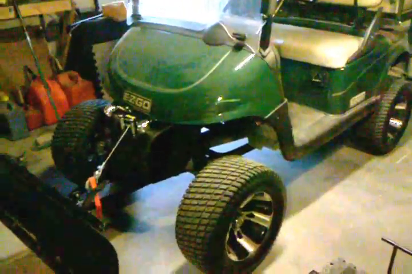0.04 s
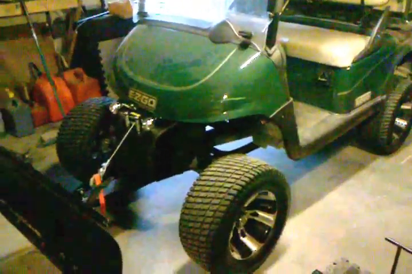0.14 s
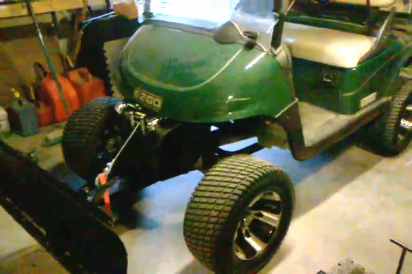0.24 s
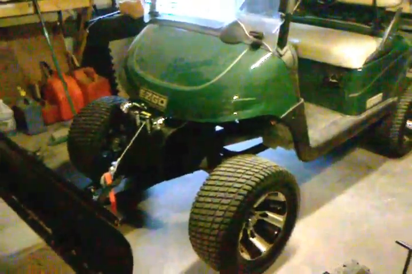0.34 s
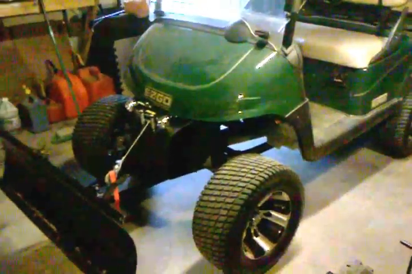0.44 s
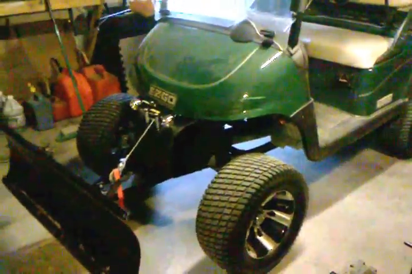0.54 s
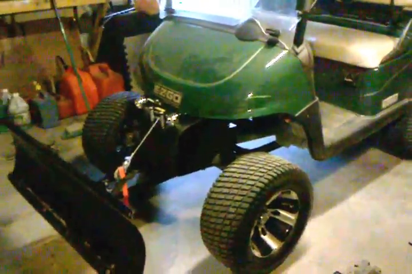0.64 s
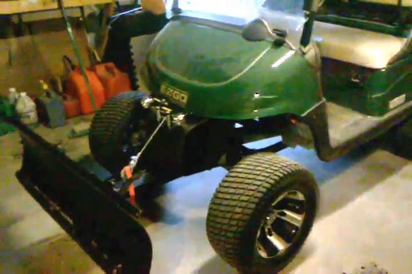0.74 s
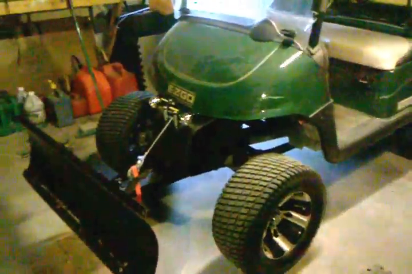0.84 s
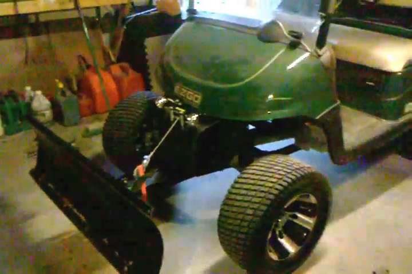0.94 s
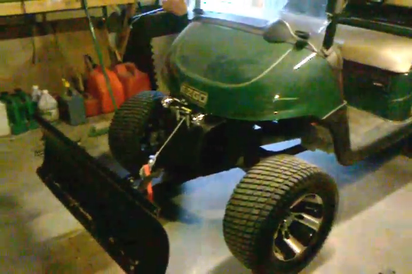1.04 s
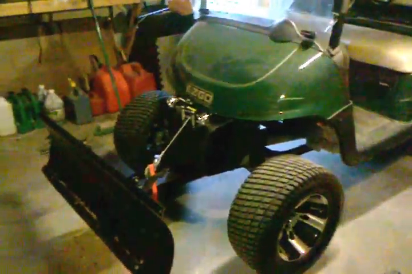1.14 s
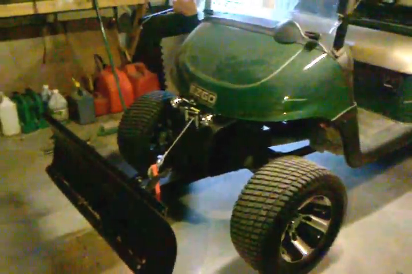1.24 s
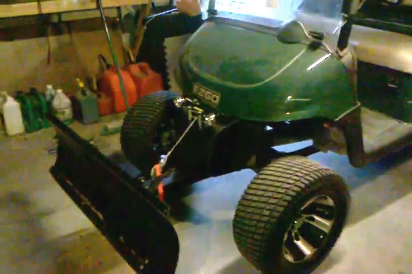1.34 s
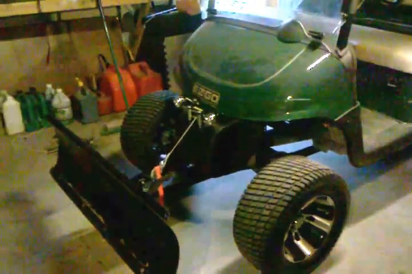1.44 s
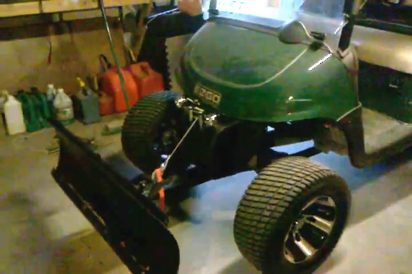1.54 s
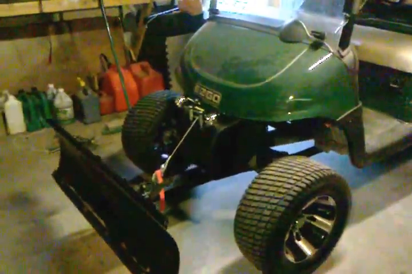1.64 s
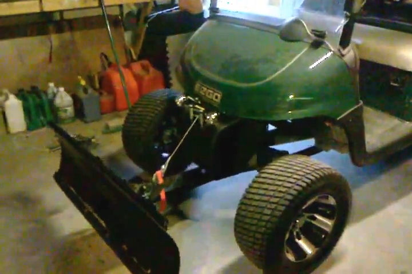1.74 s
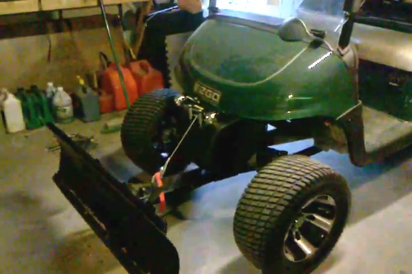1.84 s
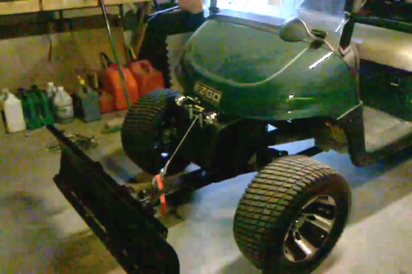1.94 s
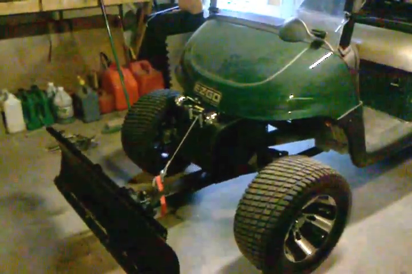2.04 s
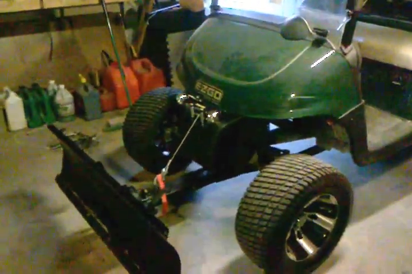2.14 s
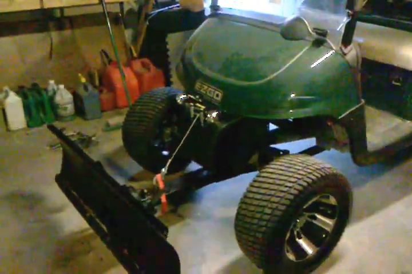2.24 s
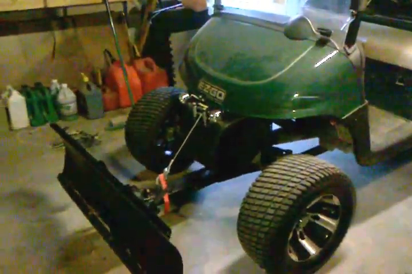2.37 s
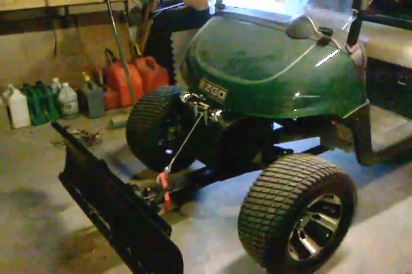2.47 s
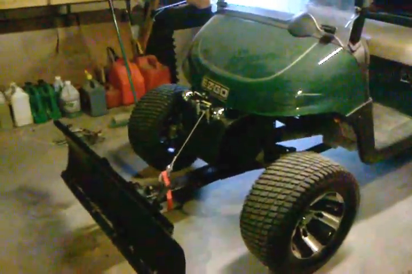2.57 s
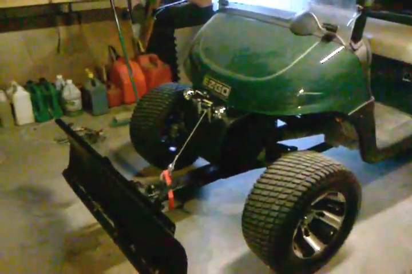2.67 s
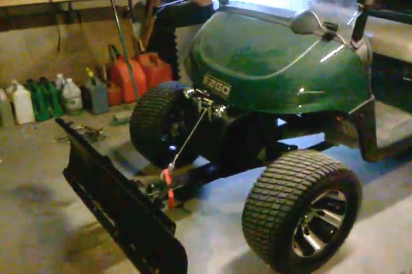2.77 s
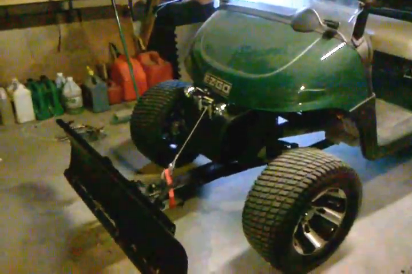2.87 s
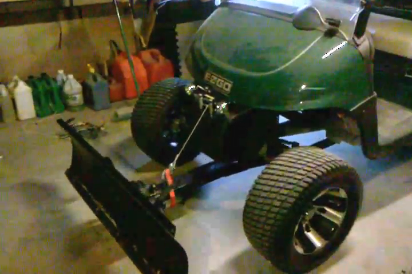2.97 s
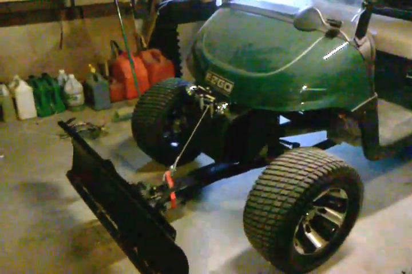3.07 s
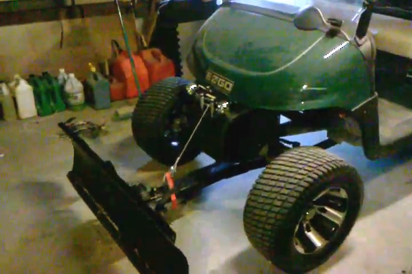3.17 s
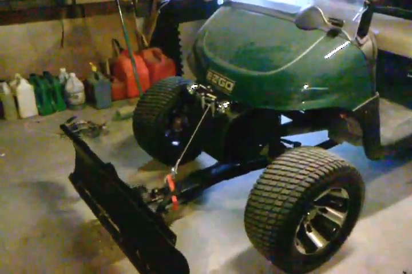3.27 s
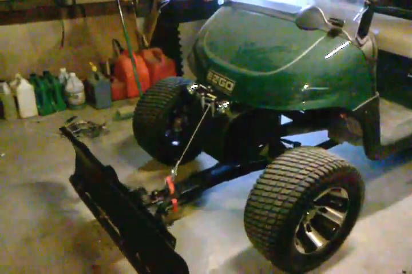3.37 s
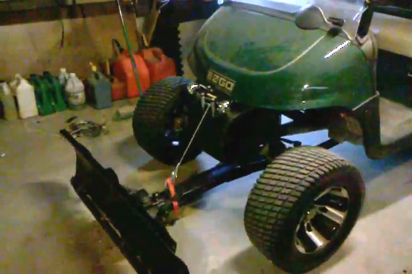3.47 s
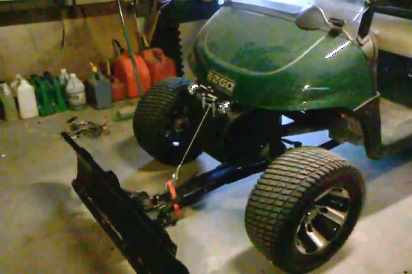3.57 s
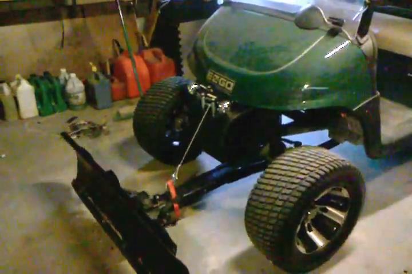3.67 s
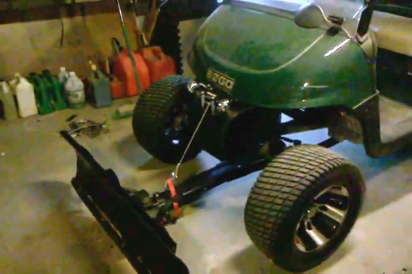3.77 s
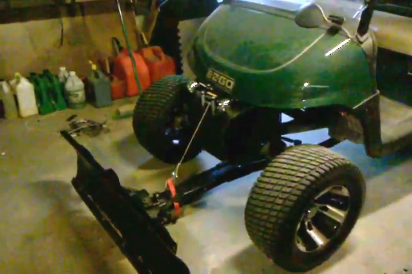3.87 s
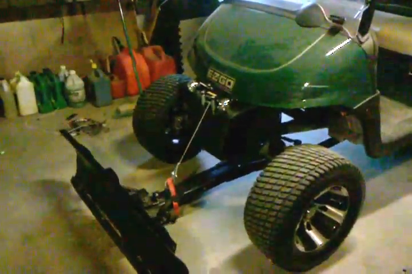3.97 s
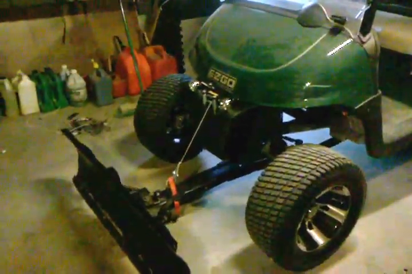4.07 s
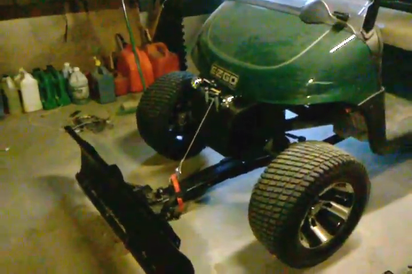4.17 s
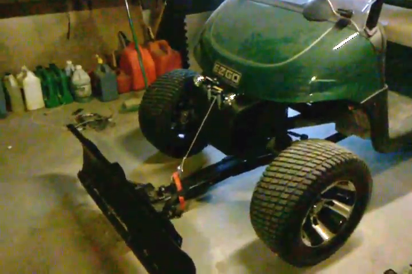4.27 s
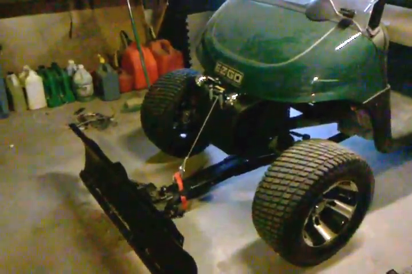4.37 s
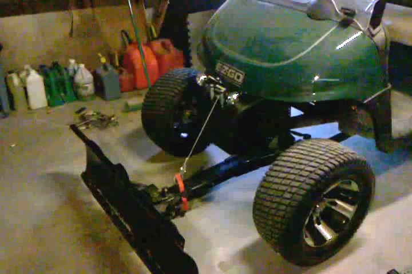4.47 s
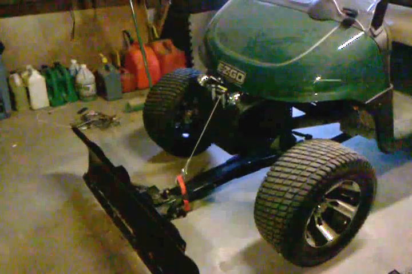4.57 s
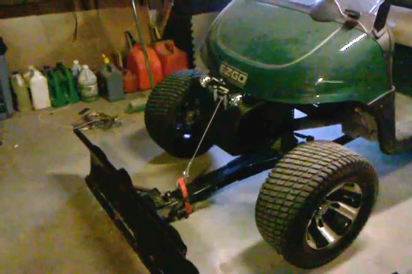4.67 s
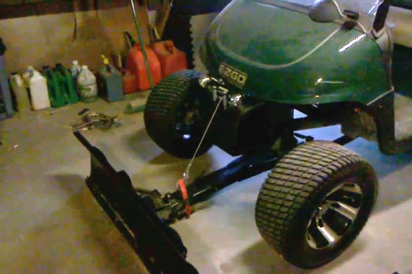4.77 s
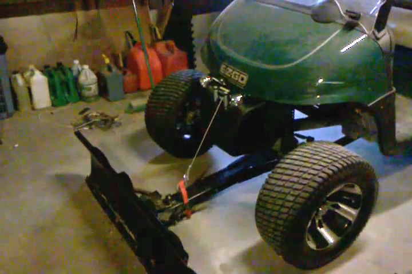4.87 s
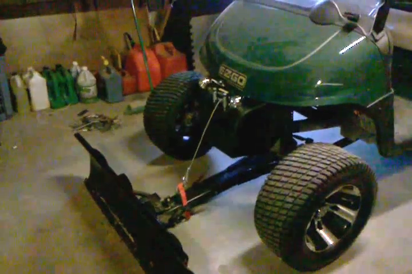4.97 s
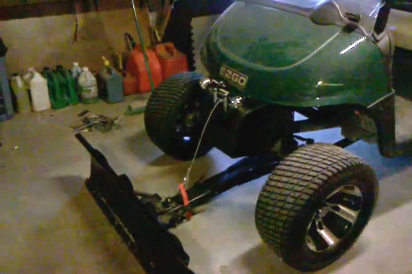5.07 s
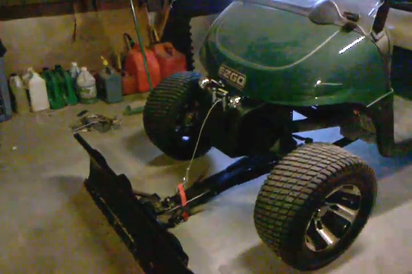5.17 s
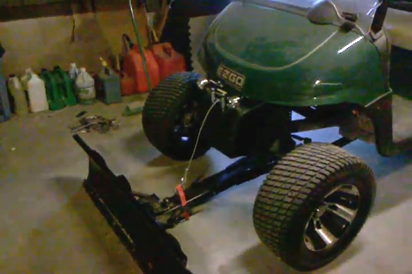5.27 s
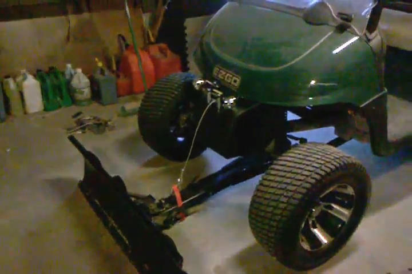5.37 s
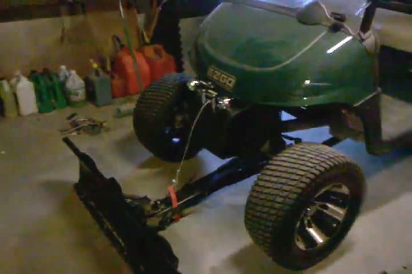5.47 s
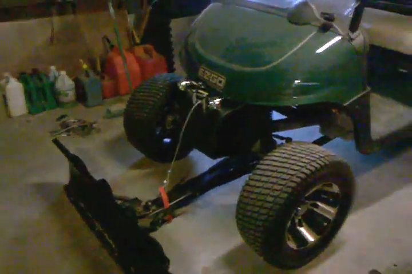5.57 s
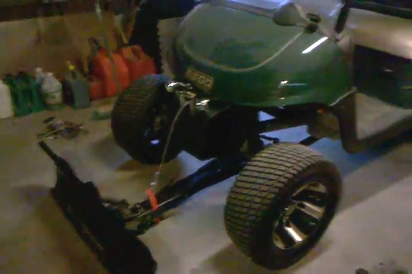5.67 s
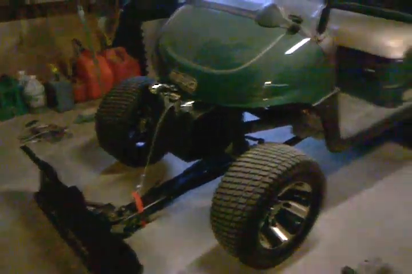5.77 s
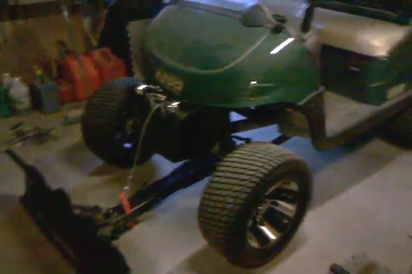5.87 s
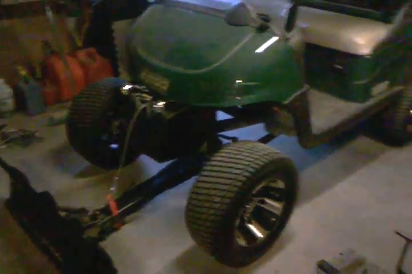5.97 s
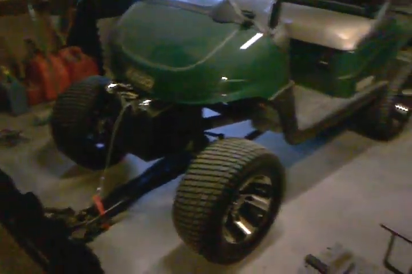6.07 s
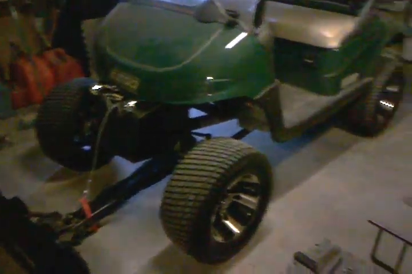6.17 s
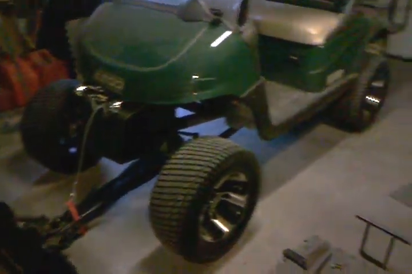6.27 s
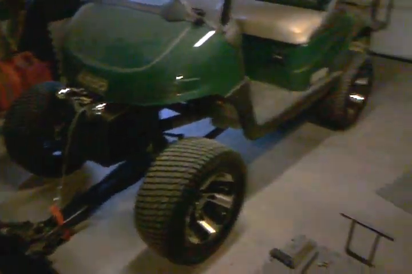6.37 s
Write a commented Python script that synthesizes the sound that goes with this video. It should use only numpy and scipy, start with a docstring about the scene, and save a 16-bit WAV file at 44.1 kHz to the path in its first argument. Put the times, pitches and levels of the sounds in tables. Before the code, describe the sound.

Faint rumble and hiss fill a garage with a short echo. At about 1.2 seconds a plastic switch clicks close to the microphone, and from 1.4 to 2.1 seconds a small electric winch runs a few metres away, with a steady gear whine, a rattling housing and a light hiss. A second click at 2.6 seconds leads to another run from 2.8 to 3.7 seconds, which rasps harder in a few brief surges. A third click comes at 4.3 seconds, and the winch runs again from 4.5 seconds. At about 5 seconds a steel plough blade lands on the concrete with a quick cluster of crunching, ringing knocks, and the unloaded winch turns much quieter. It stops at about 5.3 seconds as the metal hook clinks twice on the slack cable. The ringing fades, leaving faint room noise until about 6.4 seconds.

```python
"""A winch lowers a plough blade

In a garage, over faint room noise, a switch clicks before each of three short runs of a small electric
winch. Its gear teeth whine as they meet and rattle in their housing. In the last run the steel blade
lands on the concrete and rings, then the hook on the slack cable clinks. A microphone with two sound
openings (ports) hears it all from a few metres away."""
import sys
import numpy as np
from scipy import signal
from scipy.fft import rfft, irfft, next_fast_len
from scipy.io import wavfile
from scipy.ndimage import uniform_filter1d

SR = 44100
rng = np.random.default_rng(int(sys.argv[2]) if len(sys.argv) > 2 else 0)


def generate_wav(signal):
    """Clip the signal to [-1, 1] and save it as 16-bit WAV at the path in sys.argv[1]."""
    frames = np.transpose(np.atleast_2d(signal))
    scaled = np.clip(frames, -1, 1) * 32767
    pcm = np.round(scaled).astype(np.int16)
    wavfile.write(sys.argv[1], SR, pcm)


N = 282681
TIME = np.arange(N) / SR
FFT_SIZE = next_fast_len(N + 3 * SR // 2, real=True)  # spare length for echoes
FREQ = np.arange(FFT_SIZE // 2 + 1) * SR / FFT_SIZE
PORT_LAG_S = 15 / SR  # time sound takes from one port to the other


def gain(db):
    """Turn decibels into a number to multiply by."""
    return 10 ** (np.asarray(db) / 20)


def unit(x):
    """Scale a signal to an average power of 1."""
    return x / np.sqrt(np.mean(x ** 2))


def curve(points):
    """Join (Hz, value) points into a curve over all frequencies, on a log scale."""
    hz, value = np.transpose(points)
    return np.interp(np.log(FREQ + 1), np.log(hz), value)


def filtered(x, response):
    """Filter a signal with one gain for each frequency."""
    return irfft(rfft(x, FFT_SIZE) * response, FFT_SIZE)[..., :N]


def resonances(rows):
    """A filter with a peak for each (Hz, width Hz, dB) row, alternating in sign."""
    return sum((-1) ** k * gain(db) * 1j * FREQ * width / (hz ** 2 - FREQ ** 2 + 1j * FREQ * width)
               for k, (hz, width, db) in enumerate(rows))


def lows(split_hz):
    """A steep curve: 1 below the split, 0 above it."""
    return 1 / (1 + (FREQ / split_hz) ** 10)


def fade(age, fade_s):
    """Die away by 60 dB in fade_s seconds, as all fade times here do."""
    return np.exp(-np.log(1000) * age / fade_s)


def drift(rate_hz):
    """Smooth random wandering, about 1 in size."""
    step = max(int(SR / rate_hz), 1)
    stairs = np.repeat(rng.standard_normal(N)[:N // step + 1], step)
    return unit(uniform_filter1d(stairs, step)[:N])


def blows(hits, contact_s):
    """A short, rough push for each (s, dB) hit."""
    push = np.zeros(N)
    for start, db in hits:
        age = TIME[:N - int(start * SR)]
        scrape = rng.standard_normal(N)[:len(age)] * np.exp(-age / contact_s)
        push[-len(age):] += gain(db) * scrape
    return push


def ring(hits, tones):
    """Each (s, dB) hit sets an object's own (Hz, dB, fade s) tones ringing."""
    out = np.zeros(N)
    for start, db in hits:
        age = TIME[:N - int(start * SR)]
        attack = 1 - np.exp(-age / 0.002)
        for hz, tone_db, fade_s in tones:
            wave = np.sin(2 * np.pi * (hz * age + rng.random()))
            out[-len(age):] += gain(db + tone_db) * wave * fade(age, fade_s) * attack
    return out


def surrounding_noise(port_match=0.93):
    """Noise from all sides, as the ports' sum and difference; they hear nearly the same bass."""
    likeness = port_match * np.sinc(2 * FREQ * PORT_LAG_S)
    return filtered(rng.standard_normal((2, N)), np.sqrt([1 + likeness, 1 - likeness]) / np.sqrt(2))


def room_noise():
    """A soft rumble and hiss from all around, slowly rising and falling."""
    # tone colour of the noise: (frequency [Hz], relative level [dB])
    spectrum = [(25, -25.5), (70, -10), (160, -10), (310, 0), (600, -4), (1000, -10.5), (1900, -11),
                (2800, -19), (4500, -20.5), (7500, -14.5), (10000, -19), (13000, -18.5)]
    # its loudness: (time [s], rumble [dB], hiss [dB])
    levels = [(.65, -65, -65), (1.1, -69, -69), (2.7, -60.5, -62.5), (4.1, -64.5, -70), (4.45, -63, -66),
              (5.5, -62, -65.5), (5.92, -60.5, -62), (6.0, -65.5, -71), (6.4, -65.5, -64)]
    times, *columns = np.transpose(levels)
    rumble_db, hiss_db = [np.interp(TIME, times, column) for column in columns]
    colour, below = gain(curve(spectrum)), lows(3000)
    rumble = unit(filtered(surrounding_noise(), colour * np.sqrt(below)))
    rumble *= gain(rumble_db + 0.64 * drift(8.3))
    hiss = unit(filtered(surrounding_noise(), colour * np.sqrt(1 - below)))
    return rumble + hiss * gain(hiss_db)


def switch(room):
    """A plastic button snaps close to the microphone."""
    # presses: (time [s], level [dB])
    clicks = [(1.1972, -31), (2.6282, -28.5), (4.2618, -28.5)]
    # resonances of the switch body: (frequency [Hz], width [Hz], level [dB])
    body = [(444, 400, -11.5), (1475, 370, -1.5), (5020, 290, 3), (7730, 1000, -1), (9700, 1400, -8),
            (12800, 2600, -11.5)]
    snap = filtered(blows(clicks, contact_s=0.0018), resonances(body))
    return in_garage(snap, room, direct_db=9.5, early_db=4.5, late_db=-7)


def late_echoes():
    """Echoes off concrete and shelves build up quickly; the low notes last longest."""
    # how long the garage echoes: (frequency [Hz], fade time [s])
    bands = [(150, 0.81), (320, 0.83), (700, 0.65), (1500, 0.61), (3000, 0.58), (7000, 0.5), (13000, 0.31)]
    noise = surrounding_noise()
    tail = 0
    for centre_hz, fade_s in bands:
        band = curve([(hz, hz == centre_hz) for hz, _ in bands])
        tail += filtered(noise, band) * fade(TIME, fade_s)
    return tail * (1 - np.exp(-TIME / 0.02))


def garage():
    """(Early, late) echo filters for two nearby spots; early echoes come off the floor and the cart."""
    spots = [(surrounding_noise() * fade(TIME, 0.067), late_echoes()) for _ in range(2)]
    return [[rfft(echo / np.linalg.norm(echo), FFT_SIZE) for echo in spot] for spot in spots]


def in_garage(x, room, direct_db, early_db, late_db, sway_hz=0.5967):
    """Sound from straight ahead, plus echoes that change as the hand-held microphone sways."""
    sway = 2 * np.pi * sway_hz * TIME
    echoes = sum(filtered(x * share, gain(early_db) * early + gain(late_db) * late)
                 for share, (early, late) in zip([np.cos(sway), np.sin(sway)], room))
    return echoes + gain(direct_db) * np.array([x, 0 * x])


def motor(grip_s=0.017, release_s=0.03, spin_up_s=0.035, coast_s=0.2):
    """The motor's turning force comes and goes quickly, while the gears coast on."""
    # runs: (on [s], off [s], level [dB], drum's time to gain speed [s], level drop [dB/s])
    runs = [(1.402, 2.121, -19.5, 0.052, 6), (2.830, 3.686, -21, 0.11, 2), (4.463, 5.256, -20.5, .035, 2)]
    force, speed, level_db, drum_lag = np.zeros((4, N))
    for on, off, db, take_up_s, drop in runs:
        held, released = np.maximum(TIME - on, 0), np.maximum(TIME - off, 0)
        force += (1 - np.exp(-held / grip_s)) * np.exp(-released / release_s)
        speed += (1 - np.exp(-held / spin_up_s)) * np.exp(-released / coast_s)
        level_db = np.where(TIME >= on, db - drop * (held - released), level_db)
        drum_lag = np.where(TIME >= on, np.exp(-held / take_up_s), drum_lag)  # 0 at full speed
    return force, np.minimum(speed, 1), level_db, drum_lag


def winch_levels(level_db, drum_lag, grounded_s=4.99, unload_s=0.079):
    """Rattle and hiss grow with speed, surge at times, and drop once the floor carries the blade."""
    # the gears briefly rasp harder: (time [s], rattle rise [dB], hiss rise [dB])
    surges = [(2.878, 4.5, 2.5), (2.934, 1.5, 2), (3.072, 3, 7), (3.171, 4.5, 5.5), (3.463, 2, 5),
              (4.797, 1, 1.5)]
    slack = np.clip((TIME - grounded_s) / unload_s, 0, 1)
    rattle_db = level_db - 10.5 * drum_lag - 13.5 * slack
    hiss_db = level_db - 12 - 10 * drum_lag - 8 * slack
    for peak_s, rattle_rise_db, hiss_rise_db in surges:
        surge = np.exp(-((TIME - peak_s) / 0.018) ** 2)
        rattle_db += rattle_rise_db * surge
        hiss_db += hiss_rise_db * surge
    return rattle_db, hiss_db


def gear_whine(tooth_phase, flutter_db=2, phase_drift=0.46):
    """Teeth meeting in turn make a stack of tones; wear makes each tone waver."""
    # tones of the whine: (multiple of the tooth rate, relative level [dB])
    tones = [(.5, -29.5), (1, 0.5), (2, 0.5), (3, -18), (4, -4.5), (5, -5), (6, -8), (7, -8), (8, -11.5)]
    whine = 0
    for multiple, db in tones:
        strength = gain(db + flutter_db * drift(22))
        phase = multiple * tooth_phase + 2 * np.pi * rng.random() + phase_drift * drift(14)
        whine += strength * np.sin(phase)
    return unit(whine)


def rattle_and_hiss(tooth_phase, rattle_db, hiss_db, taps_per_s=5000, scatter_db=3, flutter_db=2.1):
    """Loose gear teeth tap and ring the housing; the motor's sliding contacts (brushes) hiss."""
    # tone colour of the rattle and hiss: (frequency [Hz], relative level [dB])
    spectrum = [(30, -53.5), (100, -40.5), (170, -18.5), (310, -7), (450, -7), (750, -1.5), (1400, -2),
                (2200, -4.5), (3100, -15), (4500, -28.5), (6200, -21), (7600, -22), (10000, -30),
                (13000, -38)]
    # resonances of the housing and its bracket: (frequency [Hz], width [Hz], relative level [dB])
    body = [(293.8, 22, -0.5), (350.2, 16.6, 8), (697, 79, -12.5), (778, 5.7, 3.5), (937, 25, -13.5),
            (1038, 8.4, -4.5), (1245, 50, 2), (1310, 16, 9), (1442, 86, -0.5), (1546, 43, 6),
            (1706, 20, -9.5), (1860, 17, -1.5), (2120, 13, -11), (2298, 15, 4.5), (3500, 68, -28)]
    taps = (rng.random(N) < taps_per_s / SR) * rng.standard_normal(N)
    taps *= gain(scatter_db * rng.standard_normal(N))
    taps *= 1 + 0.06 * np.cos(tooth_phase)  # a little stronger once per tooth
    taps *= gain(flutter_db * drift(40))
    colour, below = gain(curve(spectrum)), lows(2910)
    teeth = gain(-1.41) * unit(filtered(taps, colour * np.sqrt(below)))
    housing = gain(-4) * unit(filtered(taps, resonances(body)))
    brushes = unit(filtered(taps + rng.standard_normal(N) / 2, colour * np.sqrt(1 - below)))
    return gain(rattle_db) * (teeth + housing) + gain(hiss_db) * brushes


def winch(room, tooth_hz=313.8, pulse_hz=13.7, pulse_db=2, throb_hz=21, throb_db=1):
    """The motor turns the cable drum through gears that whine and rattle."""
    force, speed, level_db, drum_lag = motor()
    rattle_db, hiss_db = winch_levels(level_db, drum_lag)
    # the drum loads the gears unevenly, so the pitch wanders
    wander = 1 + 0.00342 * drift(11) + 0.01702 * drift(260)
    tooth_phase = 2 * np.pi * np.cumsum(tooth_hz * np.sqrt(speed) * wander) / SR
    # the teeth only sing at speed and with weight on the cable
    load = np.tanh(gain(rattle_db + 26)) ** 2
    whine = force * speed ** 4 * load * gear_whine(tooth_phase)
    whine *= gain(pulse_db * np.cos(tooth_phase * pulse_hz / tooth_hz))  # from an off-centre gear
    throb = throb_db * np.cos(tooth_phase * throb_hz / tooth_hz)  # from a slower pair of gears
    clatter = force * rattle_and_hiss(tooth_phase, rattle_db + throb, hiss_db)
    return (in_garage(clatter, room, direct_db=-6, early_db=-1.02, late_db=-6)
            + in_garage(whine, room, direct_db=-24.5, early_db=-33.5, late_db=-32.5))


def blade(room):
    """The steel edge crunches on the concrete and the blade booms."""
    # the blade hits the floor: (time [s], level [dB])
    landings = [(4.885, -35.5), (4.977, -20.5), (4.992, -19.5), (5.035, -25), (5.096, -36)]
    # ringing tones of the blade: (frequency [Hz], level [dB], fade time [s])
    tones = [(129, -20.5, 0.41), (156.3, -7.5, 0.26), (262, 1, 0.084), (308, 0.5, 0.29), (353, 0.5, 0.23),
             (379.4, -5.5, 0.42), (382.8, -32.5, 3.46), (505, -35.5, 3.6), (573, -36, 4.1), (701, -2, 0.55),
             (785, -5.5, 0.71), (1083, -35.5, 2.6), (1260, -35, 2.9), (1424, -7, 0.22), (1653, -40.5, 2.9),
             (1723, -40.5, 3)]
    crunch_colour = resonances([(333, 190, 3.5), (1500, 1900, 6.5), (3780, 3400, 2.0)]) ** 2
    crunch = filtered(blows(landings, contact_s=0.0097), crunch_colour)
    boom = filtered(ring(landings, tones) + crunch, 1 - lows(138))  # the boom carries no deep bass
    return in_garage(boom, room, direct_db=-1.4, early_db=-6.5, late_db=-12.5)


def hook(room):
    """On the slack cable, the hook drops against its eye and clinks."""
    # hits of the hook: (time [s], level [dB])
    clinks = [(5.274, -28.5), (5.312, -35.5)]
    # ringing tones of hook and bracket: (frequency [Hz], level [dB], fade time [s])
    tones = [(698, -16.5, 1), (1276, -11.5, 0.32), (1502, -1, 0.71), (1565, 0, 0.53), (2000, -26, 0.36),
             (2650, -12, .35), (3830, -29, 0.36)]
    tick = filtered(blows(clinks, contact_s=0.021), resonances([(1720, 1400, 7.4)]) ** 2)
    return in_garage(ring(clinks, tones) + tick, room, direct_db=-5, early_db=-11.5, late_db=-10)


def scene():
    """All the sounds at the microphone's left and right ports."""
    room = garage()
    mid, side = winch(room) + switch(room) + blade(room) + hook(room) + room_noise()
    return np.array([mid + side, mid - side])


def record(dry, top_hz=14000):
    """Each channel is one port minus the delayed other port, evened out, with the highest treble cut."""
    # in the treble only part of the other port is taken away
    depth = curve([(3200, 1), (5500, 0.32), (9000, 0.4), (13000, 0.36)])
    other_port = depth * np.exp(-2j * np.pi * FREQ * PORT_LAG_S)
    difference = dry - filtered(dry[::-1], other_port)
    # give back what sound from all sides loses in the subtraction
    power = 1 + depth ** 2 - 2 * np.sinc(2 * FREQ * PORT_LAG_S) * other_port.real
    even = filtered(difference, -1j / np.sqrt(power + 0.002))
    # the left is fuller in the low mids: (frequency [Hz], left minus right [dB])
    lean_db = curve([(80, 0.5), (200, 0.5), (320, 4.0), (650, -1.1), (1300, -0.05), (2300, 1.44),
                     (4000, -0.45)])
    stereo = filtered(even, gain(np.array([lean_db, -lean_db]) / 2))
    treble_cut = signal.ellip(10, 0.2, 80, top_hz, fs=SR, output="sos")
    return signal.sosfilt(treble_cut, stereo)


dry = scene()
out = record(dry)
generate_wav(out)
```